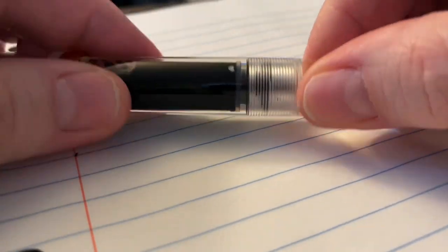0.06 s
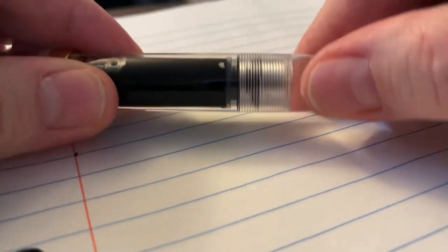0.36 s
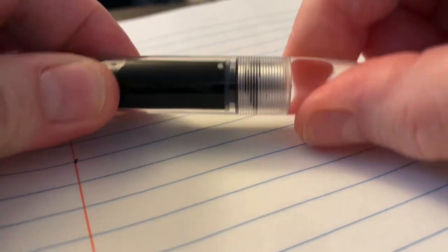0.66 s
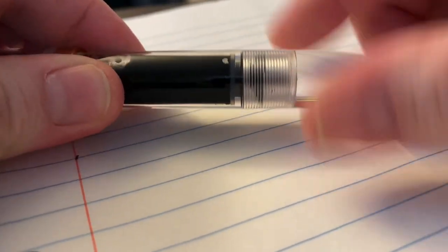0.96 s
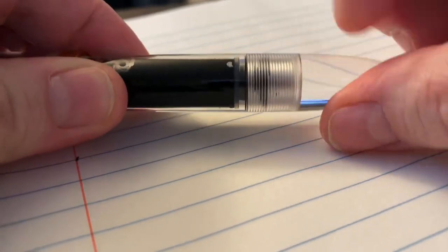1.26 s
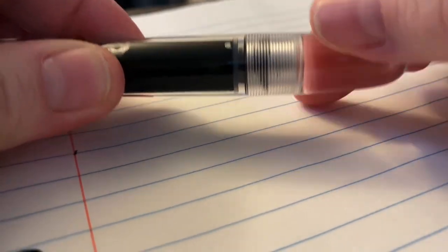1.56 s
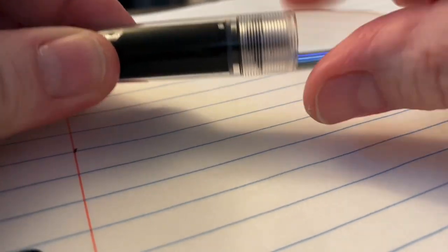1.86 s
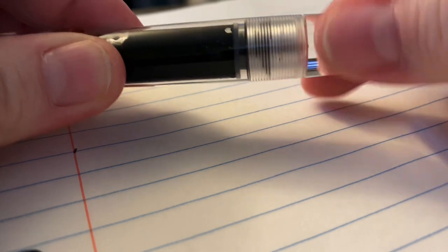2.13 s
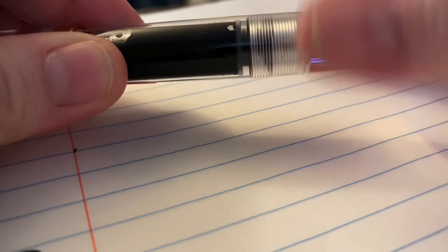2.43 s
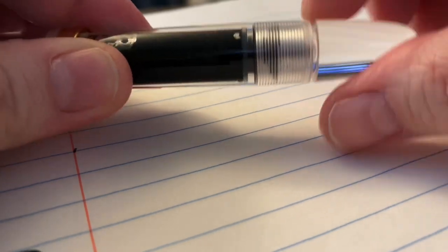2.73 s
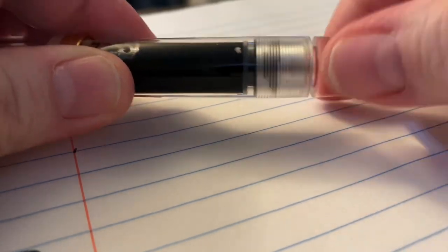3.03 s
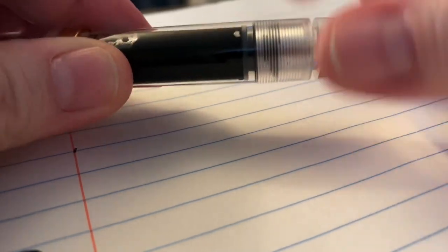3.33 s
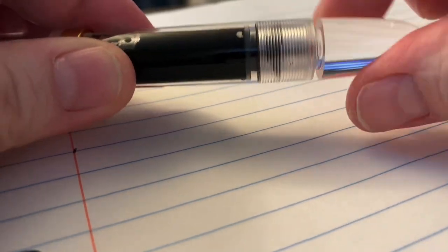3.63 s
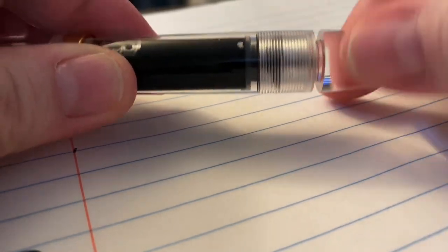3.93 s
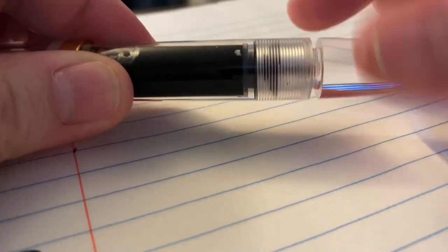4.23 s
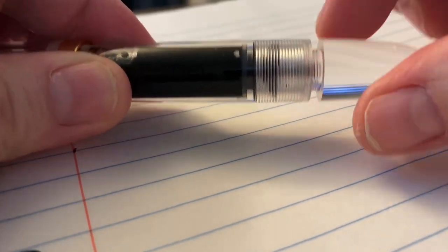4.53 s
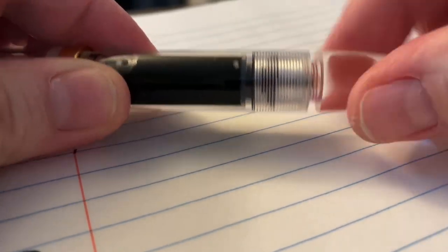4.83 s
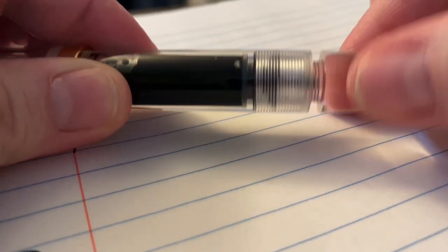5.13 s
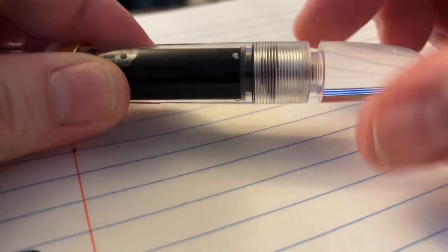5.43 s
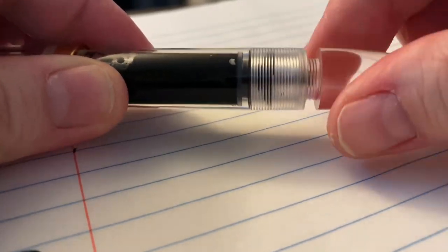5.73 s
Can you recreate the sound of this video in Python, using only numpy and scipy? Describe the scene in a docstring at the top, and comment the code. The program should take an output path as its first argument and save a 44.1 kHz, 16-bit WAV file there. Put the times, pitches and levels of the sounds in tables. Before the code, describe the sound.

In a small room with a low hum, skin rubs quietly on a plastic pen until the knob gives with a single sharp click. Light taps and brushes follow, then repeated soft finger strokes as the knob is unscrewed, its thread hissing faintly and ticking. Soft, low desk bumps sit underneath, and everything is heard from very close.

```python
"""A low room hum, and over it fingers brushing a plastic fountain pen, close to a camera on a desk.
The grip strains at the pen's knob until the tight thread breaks free with one sharp click. Then finger
pads land, slide and lift at each turn, the thread whispers and ticks in its play, and the desk thumps
softly under the hands. All is heard through the camera's two microphone ports, in a small room."""
import sys
import numpy as np
from scipy import signal
from scipy.fft import rfft, irfft, next_fast_len
from scipy.io import wavfile
from scipy.ndimage import uniform_filter1d, map_coordinates

SR = 44100
rng = np.random.default_rng(int(sys.argv[2]) if len(sys.argv) > 2 else 0)


def inscribe(sig):
    """Save sig as 16-bit PCM at rate SR to the path in sys.argv[1].

    A 1-D sig is mono; a 2-D sig holds one channel per row.
    Samples are clipped to [-1, 1] before scaling.
    """
    pcm = np.round(np.clip(np.atleast_2d(sig).T, -1, 1) * 32767)
    wavfile.write(sys.argv[1], SR, pcm.astype(np.int16))


N = 263585

# brief dips in the hum: t/s, depth/dB
HUM_DROPS = [(.69, 3), (1.1, 5.5), (2.17, 17), (3.42, 9), (5.43, 9)]
# skin brushes the pen as the grip shifts: middle t/s, length/s, hiss level/dB, dull rub re hiss/dB
BRUSHES = [(0.03, 0.15, -72.5, 12.5), (0.168, 0.089, -60, 6.5), (0.248, .11, -65, 12),
           (0.372, .15, -57, -2.5), (0.703, 0.11, -68.5, 12.5), (.77, 0.085, -65, 9.5),
           (0.845, 0.027, -61, 5.5), (0.902, .075, -41.5, -11), (0.95, 0.086, -58, 4),
           (1.077, 0.12, -67.5, -1), (1.198, 0.17, -63, 9), (1.278, 0.072, -61, 4.5),
           (1.388, 0.17, -62, 2.5), (2.286, 0.17, -67.5, -9.5), (2.341, 0.047, -46.5, -14.5),
           (3.466, 0.069, -61.5, -6), (4.127, 0.066, -53.5, -10), (4.193, 0.17, -70, -7),
           (5.297, 0.12, -66, -6.5), (5.368, .06, -56.5, -17)]
# light dry taps on the plastic: t/s, level/dB
FINGER_TAPS = [(0.588, -34), (0.989, -59), (1.022, -59.5), (1.116, -51), (1.147, -53.5), (1.223, -47),
               (3.208, -67), (3.857, -72.5), (4.089, -59.5), (5.528, -73), (5.622, -70), (5.734, -69.5)]
# a fingertip lands on the knob and slides on, ever harder:
# t/s, landing level/dB, settling t60/s, slide length/s, slide level/dB, dull rub re hiss/dB
PAD_STROKES = [(1.462, -44.5, 0.019, 0.074, -49, -5.5), (2.033, -57, 0.099, 0.055, -50, -4.5),
               (2.491, -55, 0.27, 0.061, -55, -13), (2.895, -45, 0.028, 0.079, -48, -5.5),
               (3.369, -53.5, 0.076, 0.053, -54, -10), (4.277, -45.5, 0.12, 0.067, -59.5, -12),
               (4.679, -53, 0.043, 0.048, -57, -12), (5.068, -51.5, .1, 0.06, -59, -9)]
# the hands nudge the desk: t/s, level/dB
DESK_NUDGES = [(0.49, -41), (0.606, -44), (0.774, -40), (.885, -41.5), (0.901, -42), (1.217, -38),
               (1.333, -39), (1.474, -38.5), (2.75, -40.5), (2.9, -33.5), (2.917, -36.5), (3.203, -40),
               (3.387, -40.5), (4.286, -40.5), (4.686, -46.5), (5.076, -39.5)]
# what the click sets ringing: f/Hz, relative level/dB, t60/s
CLICK_MODES = [(134, -20, 0.62), (164, 5.5, 0.19), (193.3, -7, 0.3), (251, -23, 0.68), (310.5, 3.5, 0.072),
               (418, 3, 0.06), (455, 18, 0.028), (624, -14, 0.15), (748, -3.5, 0.086), (1044, -3.5, 0.083),
               (1218, -14, 0.12), (1290, -30.5, 0.41), (1810, -52, .07)]
# the knob ticks in the play of its thread: t/s, level/dB, starting f/Hz
KNOB_TICKS = [(1.062, -57, 3480), (1.268, -52, 3620), (2.742, -53.5, 2950), (3.2073, -52, 2840),
              (3.860, -60.5, 2980), (4.944, -61, 3040), (5.646, -57, 855), (5.896, -60.5, 1190)]
# the knob turns on its thread: start t/s, end t/s, hiss level/dB, swish f/Hz
KNOB_TURNS = [(1.611, 1.702, -76.5, 4720), (1.652, 1.947, -75.5, 2870), (2.076, 2.29, -73, 4370),
              (2.575, 2.716, -70, 4500), (3.025, 3.197, -73, 4500), (3.386, 3.671, -71.5, 4530),
              (3.888, 4.12, -76.5, 4500), (4.36, 4.554, -78.5, 4500), (4.73, 4.914, -77, 4560),
              (5.115, 5.305, -77.5, 4630), (5.574, 5.723, -79, 4500)]
# spectra of room air, skin hiss, dull rub, the click's crack and scrape, and thread: f/Hz, level/dB
AIR_SPECTRUM = [(15, -36.5), (26, -16.5), (40, -2.5), (62, 4.5), (85, 0), (120, -13), (160, -21.5),
                (260, -25), (500, -31.5), (1000, -39.5), (2000, -43.5), (5000, -48), (11000, -54.5),
                (16000, -64.5)]
SKIN_SPECTRUM = [(500, -13), (1900, -39), (2300, -12), (2750, -5), (3200, -21.5), (4000, -8.5), (6000, -7),
                 (7300, -0.5), (8300, -3.5), (9200, -3), (11000, 6), (13000, -0.5), (14600, -3.5),
                 (16000, -3.5)]
DULL_SPECTRUM = [(50, 0.5), (130, 9), (250, -1), (500, -3), (800, -7.5), (1050, -4.5), (1400, -11),
                 (1750, -8.5), (2200, -20.5), (3200, -21), (3900, -17.5), (5000, -24), (9000, -26.5)]
CRACK_SPECTRUM = [(300, -44), (2000, -1.5), (5000, -5), (7600, 2.5), (9000, -1.5), (10800, -9),
                  (13000, -15.5), (16000, 8.5)]
SCRAPE_SPECTRUM = [(500, 10), (2000, -1), (3200, -1.5), (5000, 0.5), (7500, -6.5), (9000, -6),
                   (11000, -5.5), (16000, -21.5)]
THREAD_SPECTRUM = [(300, -37), (2000, -9.5), (3800, -15), (4500, -9), (5500, -9), (6600, -6.5), (8200, -5),
                   (9100, 5.5), (10000, -3), (10800, 3), (13000, -3), (16000, -16)]
# how alike the room air and the close pen are at the two microphone ports: f/Hz, coherence/0..1
AIR_COHERENCE = [(30, 0.79), (60, 1), (200, .75), (700, 0.083), (16000, 0.061)]
PEN_COHERENCE = [(200, 0.86), (1500, 0.39), (2700, 0.45), (5000, 0.49), (9000, 1)]
# how far the left port leads for close sounds: f/Hz, phase/rad
PORT_LEAD = [(0, 0), (2700, .6), (3800, 0), (7500, -.1), (9000, -3.14), (10500, -5.9), (11700, -6.7),
             (13200, -9.4), (14600, -12.2), (16400, -12.9)]
# left port over right for close sounds: f/Hz, level/dB
PORT_BALANCE = [(100, -2), (400, 4.5), (700, 3.5), (1400, -1.5), (2500, 6.5), (3900, 0), (5400, 8),
                (6700, 0.5), (16000, -0.5)]
# decay of the room: f/Hz, t60/s
ROOM_DECAY = [(150, 0.17), (1500, 0.28), (6000, 0.18), (15000, 0.16)]
# the click's share at the walls, mostly treble as the low knock hardly radiates: f/Hz, level/dB
CLICK_TO_WALLS = [(200, -13.5), (900, -19.0), (2500, -1.5), (12000, -18.5)]


def amp(db):
    return 10 ** (np.asarray(db) / 20)


def unit_rms(x):
    return x / np.sqrt(np.mean(x ** 2) + 1e-20)


def along(points, hz):
    """Read (f/Hz, value) points on a log frequency axis."""
    f, values = np.transpose(points)
    return np.interp(np.log(hz + 1), np.log(f + 1), values)


def clock():
    return np.arange(N) / SR


def wobble(rate):
    """A smooth random curve, rate knots a second."""
    return map_coordinates(rng.standard_normal(int(N * rate / SR) + 4), [np.arange(N) * rate / SR])


def filtered(x, response):
    """Pass x through a complex response of frequency."""
    size = next_fast_len(N + SR // 2)
    return irfft(rfft(x, size) * response(np.fft.rfftfreq(size, 1 / SR)), size)[..., :N]


def add(track, s, sound):
    """Lay a sound into a track at time s."""
    part = track[..., round(s * SR):][..., :sound.shape[-1]]
    part += sound[..., :part.shape[-1]]


def hiss(spectrum, grain_db, patchy_db, coherence=PEN_COHERENCE):
    """Stereo noise of rms 1: tiny slips scattered in size by grain_db, in resonances that come and go."""
    bins = signal.stft(rng.standard_normal((2, N)), nperseg=512)[2]
    patches = uniform_filter1d(rng.standard_normal(bins.shape[1:]), size=4, axis=0)
    patches = unit_rms(uniform_filter1d(patches, size=12, axis=1))
    slips = signal.istft(bins * amp(patchy_db * patches), nperseg=512)[1][:, :N]
    slips *= amp(grain_db * wobble(1500))

    def mid_side(hz):
        width = np.arccos(np.clip(along(coherence, hz), -1, 1)) / 2
        return amp(along(spectrum, hz)) * [np.cos(width), np.sin(width)]
    mid, side = filtered(slips, mid_side)
    return unit_rms(np.array([mid + side, mid - side]))


def room_tone(hum_hz=60, fade_db_per_s=0.64, dip_s=0.074, whine_hz=510):
    """A low hum wavers, dips and slowly fades over a faint whine and quiet air, all more on the left."""
    t = clock()
    phase = 2 * np.pi * hum_hz * t + 0.5 * wobble(4.5) + 0.77 * np.array([wobble(1.99), wobble(0.69)])
    dips_db = sum(depth_db * np.exp(-((t - s) / dip_s) ** 2) for s, depth_db in HUM_DROPS)
    hum_db = -49 - fade_db_per_s * t + 0.1 * wobble(11) - dips_db
    hum = np.sqrt(2) * amp(hum_db) * np.sin(phase)
    whine = amp(-88) * np.sin(2 * np.pi * whine_hz * t + 1.2 * wobble(17))
    air = amp(-57.5) * hiss(AIR_SPECTRUM, grain_db=1.4, patchy_db=0.9, coherence=AIR_COHERENCE)
    return hum * amp([[2.8], [-4.5]]) + (air + whine) * amp([[1.8], [-1.8]])


def strain(break_s, build_db_per_s=18, drop_db=4, ease_db_per_s=17.5, scuff_db=2):
    """The grip slips unevenly; its rub builds against the tight thread and eases once that gives."""
    since = clock() - break_s
    effort_db = np.where(since < 0, build_db_per_s * since, -drop_db - ease_db_per_s * since)
    return amp(effort_db + scuff_db * wobble(30.2))


def brush(middle, length):
    """A brush of skin rises and falls smoothly."""
    return np.cos(np.pi * np.clip((clock() - middle) / length, -.5, .5)) ** 2


def landing(s, t60, attack_s=0.00068, snap_t60=0.0086):
    """A pad snaps onto the plastic, then settles."""
    age = np.maximum(clock() - s, 0)
    return (amp(1.5 - 60 * age / t60) + amp(-4 - 60 * age / snap_t60)) * (1 - np.exp(-age / attack_s))


def slide(s, length, release_s=0.0089):
    """A pad starts to slip, gathers speed and lifts."""
    age = clock() - s
    speed = np.sin(np.pi / 2 * np.clip(age / length, 0, 1)) ** 2.16
    return speed * np.exp(-np.maximum(age - length, 0) / release_s)


def fingers(break_s, skin_db=-3.5, flesh_db=0.9):
    """Skin on plastic, close up: grip, brushes, taps and strokes each drive a hiss and a dull rub."""
    contacts = [(amp(-83) * strain(break_s), 30)]  # hiss envelope, dull rub re hiss/dB
    contacts += [(amp(db) * brush(middle, length), dull_db) for middle, length, db, dull_db in BRUSHES]
    contacts += [(amp(db) * landing(s, t60=0.024), -2) for s, db in FINGER_TAPS]
    for s, land_db, t60, length, slide_db, dull_db in PAD_STROKES:
        stroke = np.hypot(amp(land_db) * landing(s, t60), amp(slide_db) * slide(s, length))
        contacts.append((stroke, dull_db))
    # separate contacts add in power
    bright = np.sqrt(sum(force ** 2 for force, _ in contacts))
    dull = np.sqrt(sum((force * amp(dull_db)) ** 2 for force, dull_db in contacts))
    pressure = amp(1.2 * wobble(60))
    skin = bright * amp(skin_db) * hiss(SKIN_SPECTRUM, grain_db=1.5, patchy_db=3.5)
    flesh = dull * amp(flesh_db + 1.2 * wobble(40)) * hiss(DULL_SPECTRUM, grain_db=2.6, patchy_db=2.4)
    return pressure * (skin + flesh)


def desk(low_hz=69.3, upper_hz=161, swell_s=0.01):
    """The desk under the camera thumps in its low mode; hard nudges also wake a higher one."""
    t, out = np.arange(SR // 4) / SR, np.zeros(N)
    envelope = (t / swell_s) ** 2 * np.exp(2 - 2 * t / swell_s)
    for s, db in DESK_NUDGES:
        low = amp(db) * np.sin(2 * np.pi * low_hz * t)
        upper = amp(2 * db + 23) * np.sin(2 * np.pi * upper_hz * t)  # grows as the nudge squared
        add(out, s, envelope * (low + upper))
    return out


def bending_wave(t, top_hz, glide_s, life_s):
    """A blow spread by stiffness: its high tones arrive first, so it falls in pitch."""
    phase = 2 * np.pi * top_hz * glide_s * np.log1p(t / glide_s)
    return np.sin(phase) * (1 - np.exp(-2 * t / glide_s)) * np.exp(-(t / life_s) ** 3)


def click(break_s, crack_t60=0.006, scrape_t60=0.24):
    """The thread breaks free: a bright crack, a falling knock, a low ring and a dying scrape."""
    t, knock_s = np.arange(SR // 2) / SR, break_s + .0011
    knock = amp(-18) * bending_wave(t, top_hz=1250, glide_s=.001, life_s=.013)
    ring = sum(amp(db - 60 * t / t60) * np.sin(2 * np.pi * hz * t) for hz, db, t60 in CLICK_MODES)
    body, crack_envelope, scrape_envelope = np.zeros((3, N))
    add(body, knock_s, knock + amp(-31) * ring * (1 - np.exp(-t / .004)))
    add(crack_envelope, break_s, amp(-26 - 60 * t / crack_t60))
    add(scrape_envelope, knock_s, amp(-46 - 60 * t / scrape_t60))
    crack = crack_envelope * hiss(CRACK_SPECTRUM, grain_db=0, patchy_db=0)
    scrape = scrape_envelope * hiss(SCRAPE_SPECTRUM, grain_db=3, patchy_db=1.5)
    return body + crack + scrape


def ticks(life_cycles=5.5):
    """The loose knob knocks lightly, left of centre: short falling chirps over a small thud."""
    t, out = np.arange(SR // 20) / SR, np.zeros(N)
    thud = amp(-9) * bending_wave(t, top_hz=750, glide_s=0.0015, life_s=0.012)
    for s, db, top_hz in KNOB_TICKS:
        roughness = 1 + 0.13 * rng.standard_normal(len(t))
        chirp = bending_wave(t, top_hz, glide_s=0.00085, life_s=life_cycles / top_hz)
        add(out, s, amp(db) * roughness * (thud + chirp))
    return out * amp([[1.5], [-1.5]])


def thread(swish_db=-9, swish_width_hz=380):
    """Each turn hisses most early on, then swells into a swish in the hollow barrel."""
    t = clock()
    speed, swish = np.zeros((2, N))
    for start, end, hiss_db, swish_hz in KNOB_TURNS:
        progress = np.clip((t - start) / (end - start), 0, 1)
        speed += amp(hiss_db) * np.abs(np.sin(np.pi * progress ** 0.69))
        friction = rng.standard_normal(N)
        resonance = lambda hz: signal.lfilter(*signal.iirpeak(hz, hz / swish_width_hz, SR), friction)
        barrel = unit_rms(resonance(swish_hz) + 0.32 * resonance(1.286 * swish_hz))
        swish += amp(hiss_db + swish_db) * np.sin(np.pi * progress) ** 2 * barrel
    whisper = speed * amp(1.13 * wobble(24.8)) * hiss(THREAD_SPECTRUM, grain_db=2, patchy_db=2)
    return whisper + swish * amp([[1.5], [-1.5]])


def microphone_ports(x):
    """Close sounds reach the two ports with different phase and strength."""
    half = np.array([[.5], [-.5]])

    def response(hz):
        lead = np.interp(hz, *np.transpose(PORT_LEAD))
        return np.exp(1j * half * lead) * amp(half * along(PORT_BALANCE, hz))
    return filtered(x, response)


def room(x):
    """The near walls answer after 5 ms; each frequency dies at its own speed."""
    hz, t, bins = signal.stft(rng.standard_normal((2, SR // 2)), SR, nperseg=256)
    tail = signal.istft(bins * amp(-60 * t / along(ROOM_DECAY, hz)[:, None]), SR, nperseg=256)[1]
    tail = np.pad(tail / np.linalg.norm(tail[0]), ((0, 0), (SR // 200, 0)))
    return signal.fftconvolve(x.mean(0)[None], tail, axes=1)[:, :N]


def scene(break_s=0.5927):
    """Pen and desk close to the microphone, the walls and the room tone behind them."""
    snap = click(break_s)
    handling = fingers(break_s) + thread() + ticks()
    close = microphone_ports(snap + handling + desk())
    to_walls = filtered(snap, lambda hz: amp(along(CLICK_TO_WALLS, hz))) + amp(-23) * handling
    return close + room(to_walls) + room_tone()


def record(dry):
    """The camera keeps nothing above its band limit."""
    top_hz = 15900
    return filtered(dry, lambda hz: 1 / (1 + (hz / top_hz) ** 120))


dry = scene()
out = record(dry)
inscribe(out)
```